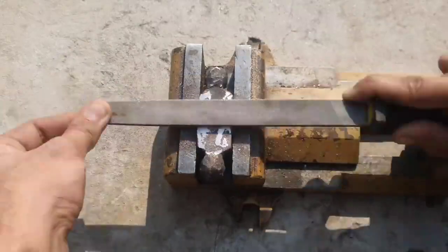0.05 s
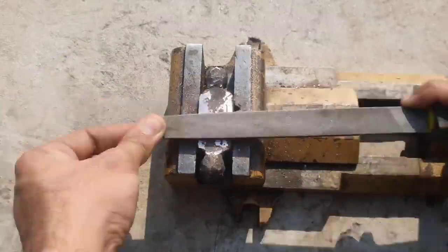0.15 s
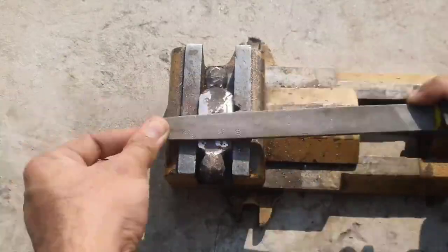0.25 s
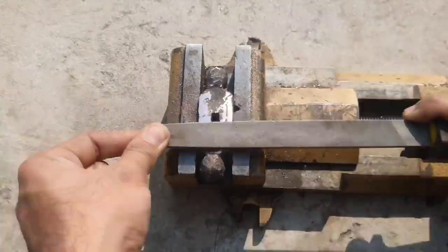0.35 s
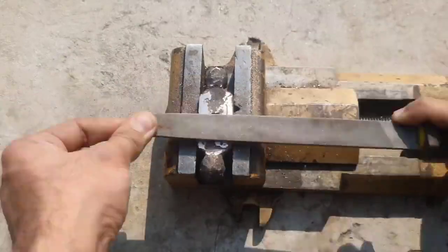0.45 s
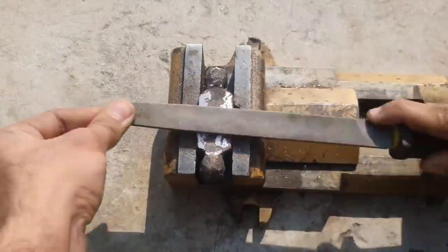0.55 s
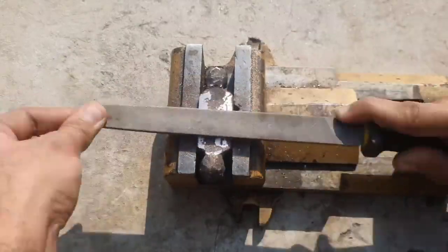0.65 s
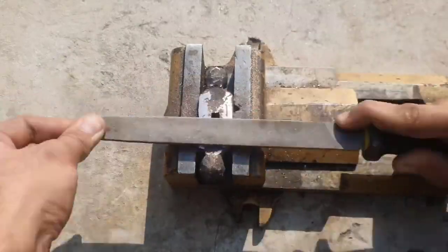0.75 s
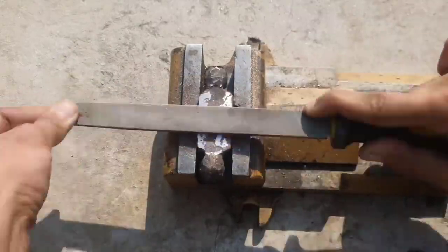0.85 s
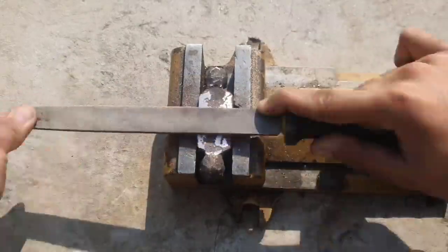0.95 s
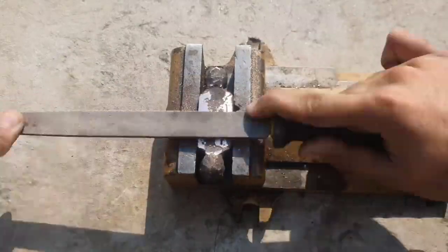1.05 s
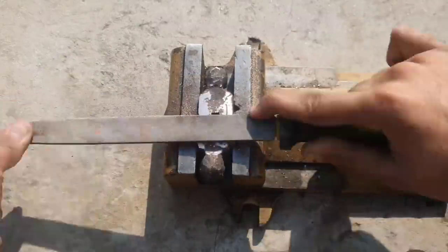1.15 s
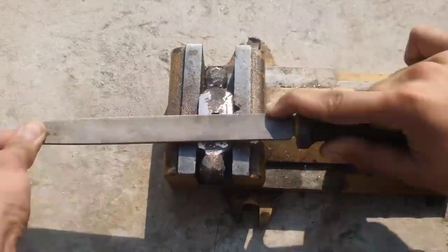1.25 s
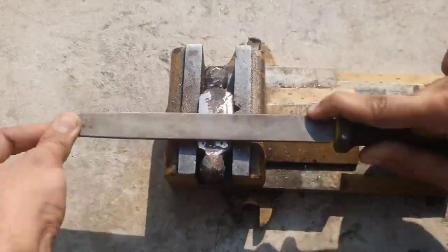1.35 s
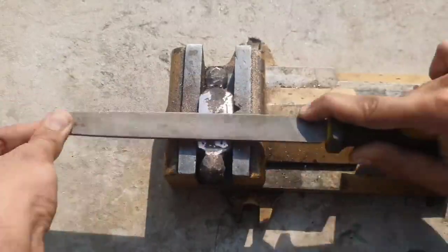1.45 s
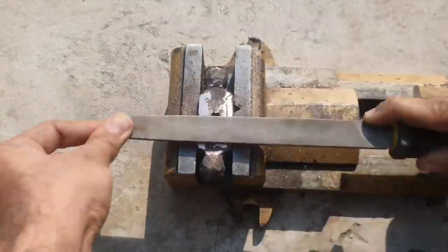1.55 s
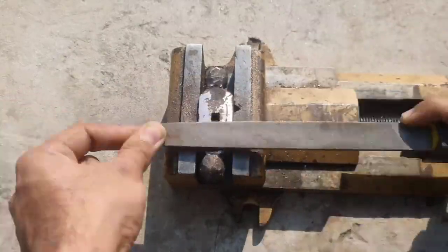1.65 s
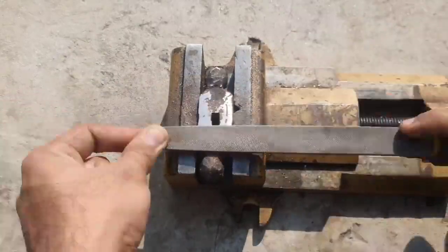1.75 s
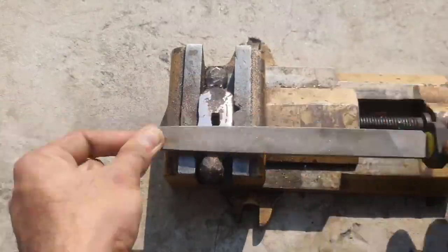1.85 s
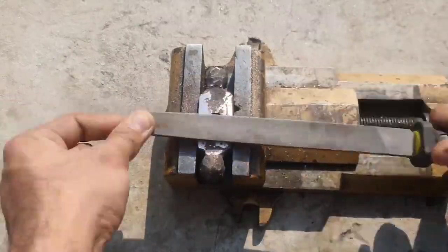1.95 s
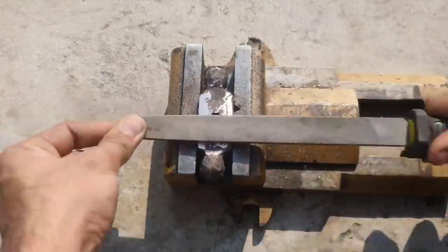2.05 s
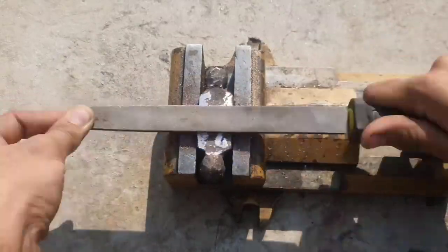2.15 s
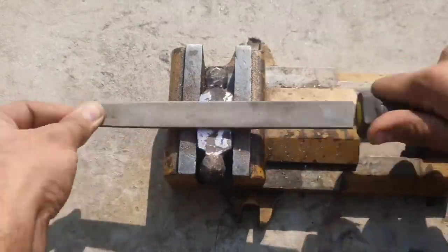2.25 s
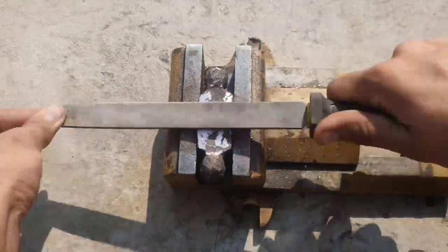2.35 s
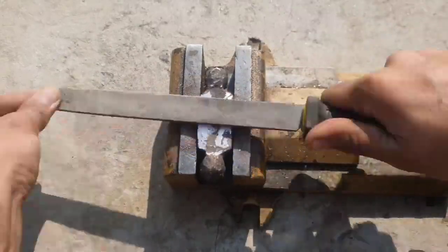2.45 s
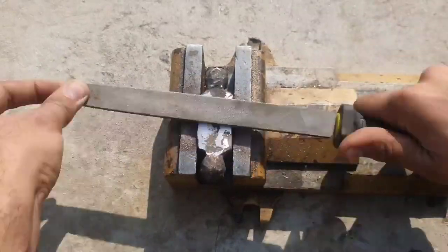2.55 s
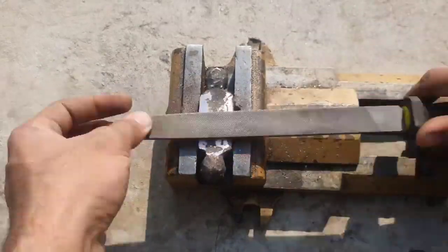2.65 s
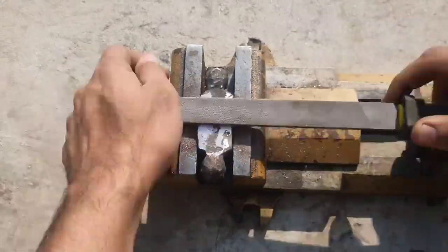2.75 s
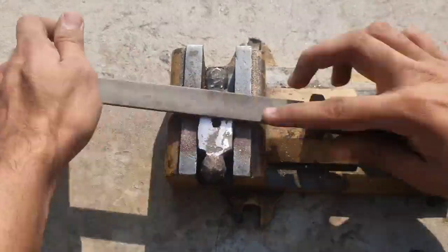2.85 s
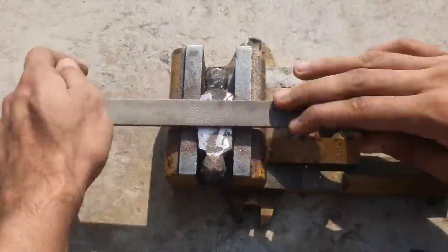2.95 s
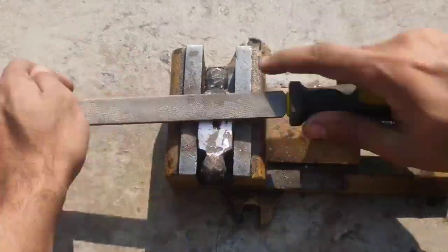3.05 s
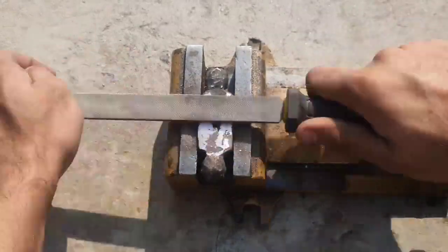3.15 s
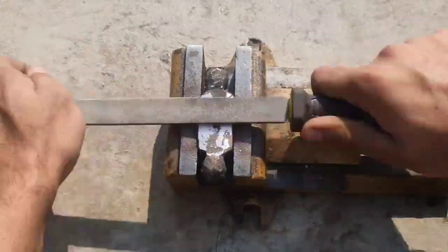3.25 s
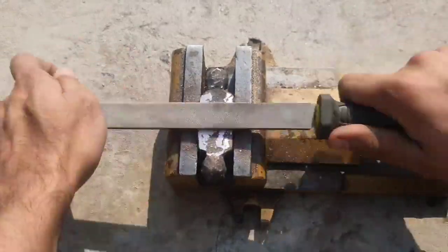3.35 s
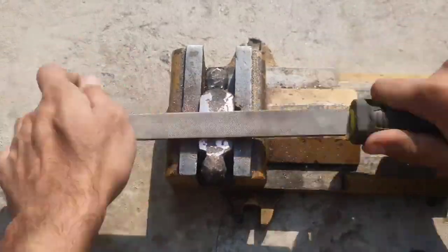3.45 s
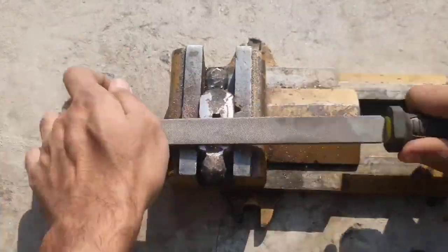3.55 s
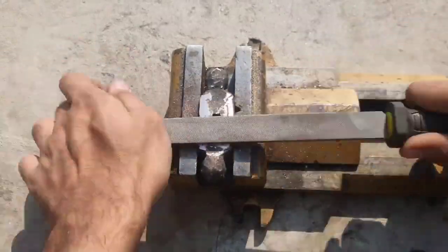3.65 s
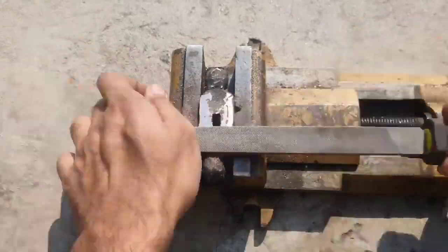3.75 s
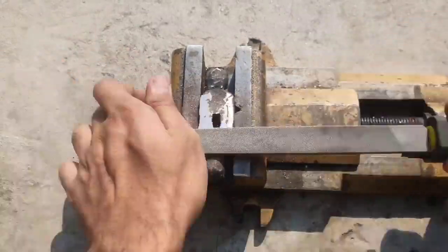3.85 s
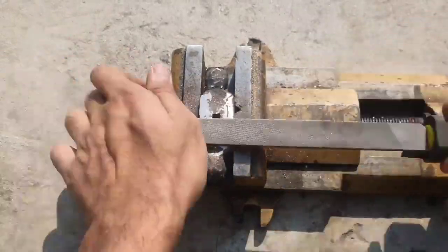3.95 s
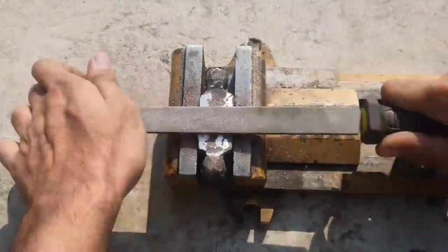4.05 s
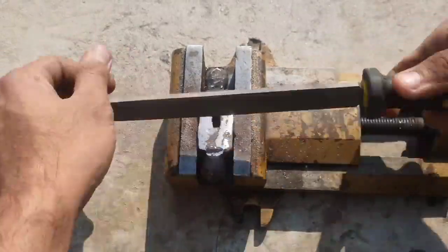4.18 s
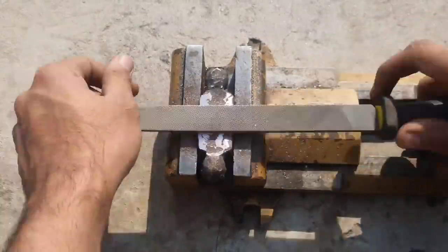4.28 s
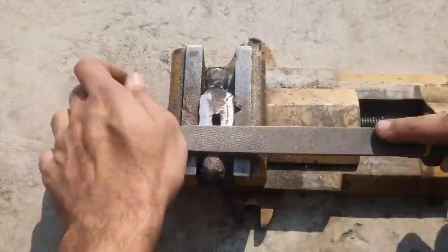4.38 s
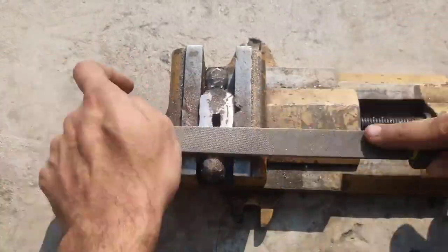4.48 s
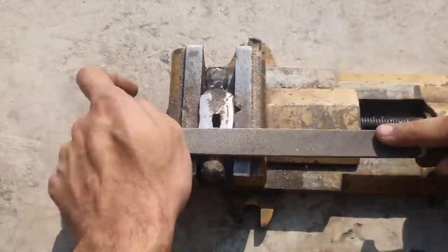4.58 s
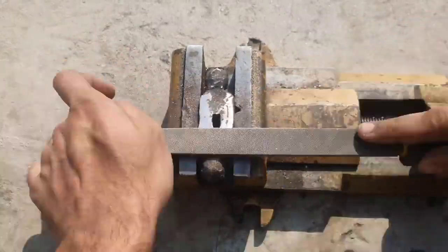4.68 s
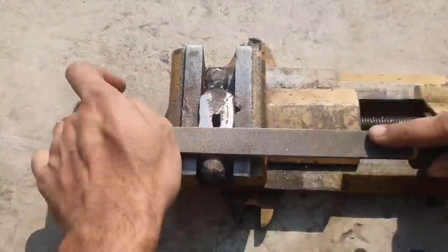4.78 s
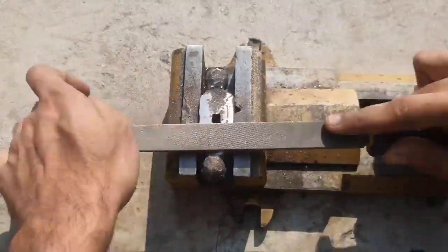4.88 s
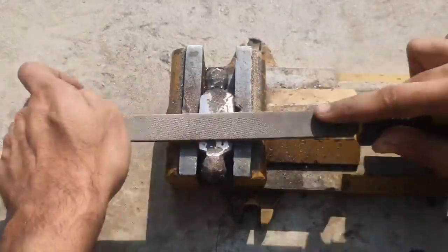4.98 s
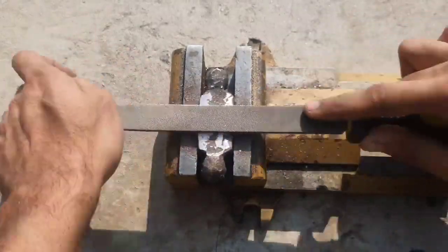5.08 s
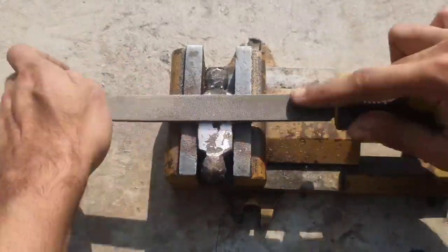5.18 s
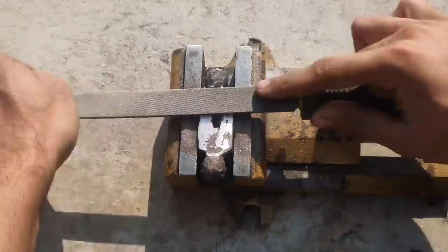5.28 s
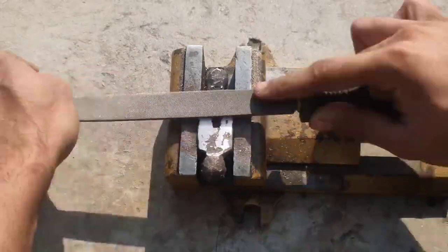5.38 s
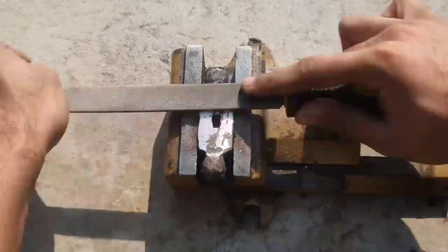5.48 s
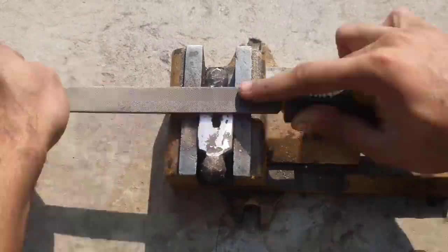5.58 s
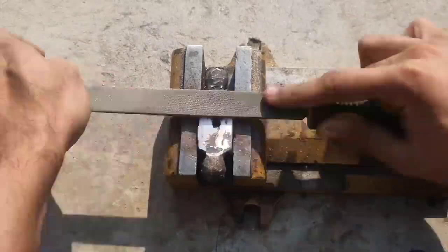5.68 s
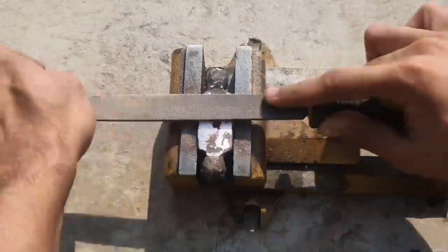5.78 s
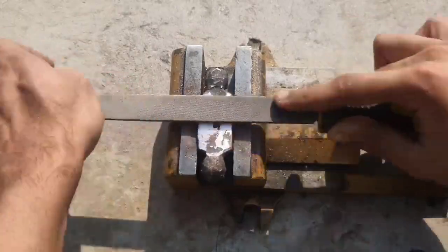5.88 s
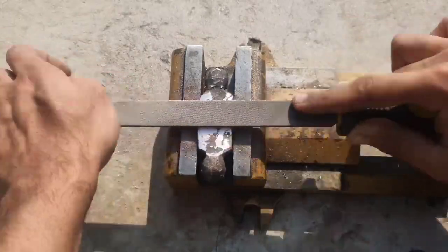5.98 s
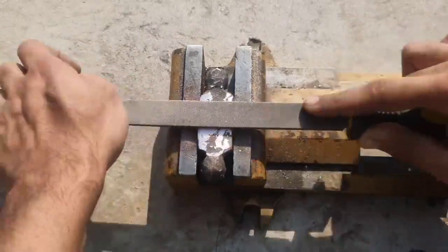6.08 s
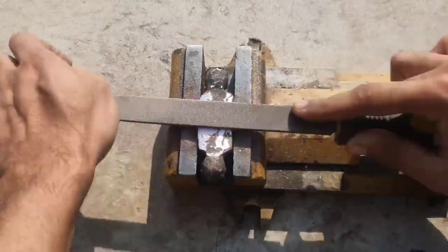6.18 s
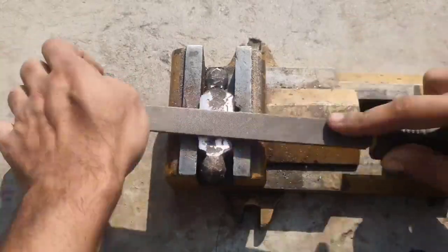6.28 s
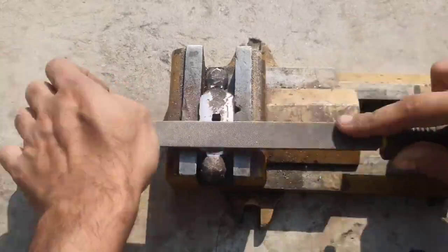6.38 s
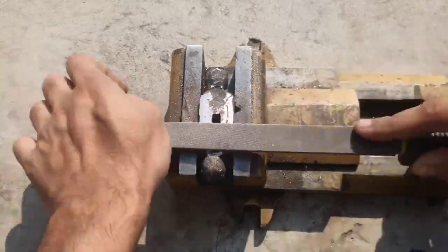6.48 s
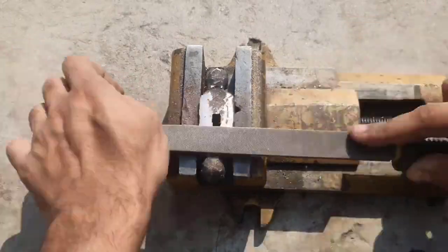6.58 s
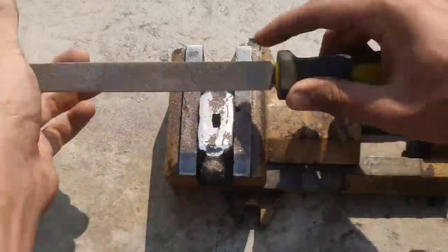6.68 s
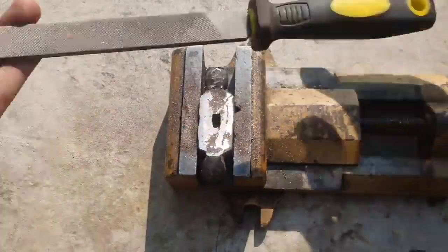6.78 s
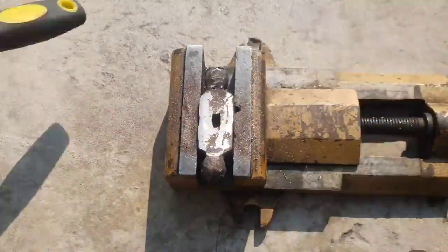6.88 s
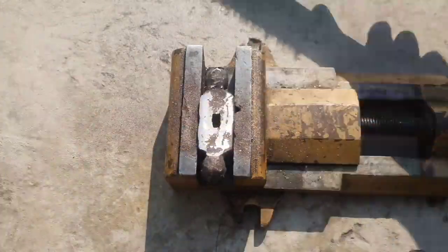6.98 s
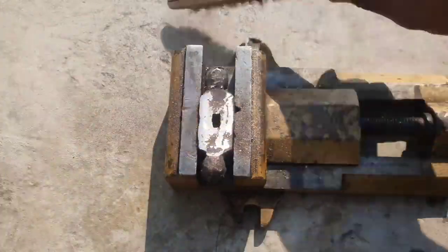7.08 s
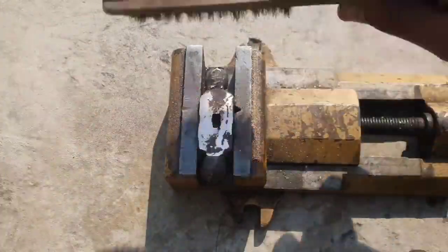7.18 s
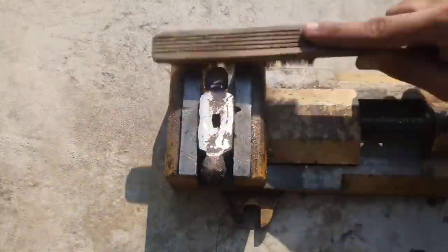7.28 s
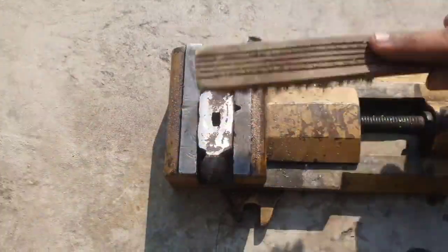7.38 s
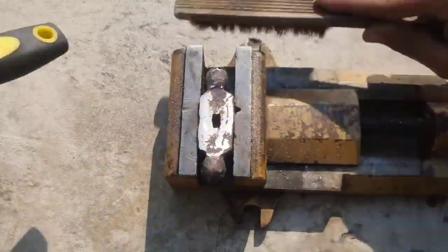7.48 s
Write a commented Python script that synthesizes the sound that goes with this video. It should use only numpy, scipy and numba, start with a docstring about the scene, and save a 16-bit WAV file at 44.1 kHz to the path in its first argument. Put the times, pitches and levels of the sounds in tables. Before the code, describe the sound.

From 0 s a file rasps to and fro over clamped steel, sped up to nearly twenty strokes a second, so the strokes fuse into a harsh, bright, gritty flutter. Each stroke swells, bites and dips at its turn; steel rings around 3.5 kHz with brief chirping squeaks throughout. Firmer knocks stand out near 1.8, 3.9 and 5.6 s, and the rasp gradually grows lighter. Wind thumps the close phone microphone, lightly at first, with a hard puff at 2.5 s, then strong flurries at 3.45 and 4.05-4.27 s, mostly on the left. The file lifts at about 4.2 s, with a soft swish, and resumes near 4.4 s. More puffs come around 5.6 s. Filing ends at 6.7 s. Near-quiet open air, low rumble and faint wavering tones remain, with small ticks at 7.0 s, gentle wipes and swishes around 7.1-7.4 s, and a sharp tap at 7.5 s.

```python
"""Sped-up filing: a file rasps to and fro over a steel blank in a vise, nearly twenty strokes a second as heard.
Dense random tooth clicks ring resonant modes of file and vise; knocks and brief squeaks stand out.
The file lifts briefly near 4.2 s and for good near 6.7 s; light taps, swishes and wipes follow.
Close to a phone outdoors, wind puffs thump on its two microphone ports as damped swings with a noisy wake.
Behind them: gusty low noise, slow pressure swings, two faint late tones and a faint hiss."""
import sys
import numpy as np
from scipy import signal
from scipy.io import wavfile
from scipy.ndimage import uniform_filter1d
from numba import njit

SR = 44100
rng = np.random.default_rng(int(sys.argv[2]) if len(sys.argv) > 2 else 0)


def bounce(signal):
    """Save signal as a 16-bit WAV file at the path given by the first command-line argument."""
    frames = np.transpose(np.atleast_2d(signal))
    limited = np.clip(frames, -1, 1)
    pcm = np.round(limited * 32767).astype(np.int16)
    wavfile.write(sys.argv[1], SR, pcm)


N = 332073

# steel modes: pitch_hz, width_hz (of each pole), level_db (relative), left_minus_right_db, left_lead_rad
RING_MODES = [(3468, 366, -3.5, 2.8, -1.18), (3714, 232, -0.5, 0.36, -0.59)]
RASP_MODES = [(4250, 304, -3, 0.75, 1.17), (5240, 650, -2, 1.3, 1.5), (5878, 380, -3, 2.3, -0.9),
              (6980, 1650, 1.5, 3.7, -0.87), (9280, 450, -5.5, 6.2, -2.5), (9590, 1200, -4, 6.9, -1.5),
              (11000, 1100, -3.5, 1, 3.5), (11770, 3530, 1, 4.4, 2.5), (12670, 840, -7, 7, 1.9),
              (14360, 3800, -7, 4.9, -3)]
# knocks on the steel: start_s, level_db, ring_offset_db, treble_offset_db
KNOCK_EVENTS = [(1.815, -14.5, -11, -11), (2.852, -23.5, -8, -2), (3.566, -22, -16, -20),
                (3.692, -21.5, -2, -14), (3.904, -17, 1.5, -15), (4.007, -23, 3.5, -4),
                (4.321, -37, -8, -20), (4.3566, -40, 8.5, 6.5), (5.043, -24, -14, -21),
                (5.572, -12, -20, -8), (6.716, -24.5, -30.5, -32), (7.078, -42.5, -25, -5),
                (7.488, -25.5, 0.5, 8), (7.501, -25.5, 3.5, -1)]
# squeaks at the hardest tooth bites: centre_s, level_db, pitch_hz
SQUEAK_EVENTS = [(0.084, -31, 3770), (0.313, -15.5, 3580), (0.362, -27, 3680), (0.434, -17, 3740),
                 (0.474, -27, 7060), (0.534, -19, 5570), (0.579, -30, 5700), (0.742, -32, 3960),
                 (0.85, -23.5, 3800), (0.906, -21, 3640), (1.17, -18, 3760), (1.336, -26, 4630),
                 (1.391, -29, 3320), (1.495, -29.0, 6290), (1.772, -33, 3670), (1.815, -38, 3780),
                 (1.877, -38, 3700), (2.036, -22.5, 6470), (2.123, -28, 4260), (2.308, -31, 3800),
                 (2.371, -24.5, 3760), (2.458, -27, 3440), (2.571, -28, 3100), (2.676, -26, 3570),
                 (2.901, -25, 3410), (2.96, -19.5, 3820), (3.119, -36, 3650), (3.219, -27, 5820),
                 (3.279, -17, 4290), (3.329, -21, 3540), (3.551, -28, 3680), (3.655, -30, 3700),
                 (3.709, -14, 3200), (3.915, -23, 7180), (4.022, -19, 6800), (4.16, -27, 3750),
                 (4.499, -23, 3560), (4.656, -21, 3730), (4.819, -24, 3710), (5.076, -27, 3840),
                 (5.13, -22, 3690), (5.185, -26, 6040), (5.402, -23.5, 6150), (5.492, -24.5, 4330),
                 (5.812, -24, 3750), (6.171, -32, 3620), (6.228, -30, 3700), (6.283, -24.5, 3630),
                 (6.455, -22.5, 3630), (6.548, -24.5, 3700), (6.706, -24.5, 3680)]


def undb(db):
    """Decibels to amplitude gain."""
    return np.exp(np.asarray(db) * (np.log(10) / 20))


def unit(x):
    """Scale to rms 1."""
    return x / np.sqrt(np.mean(np.abs(x) ** 2))


def noise():
    """Two unrelated streams of white noise."""
    return rng.standard_normal((2, N))


def walk(rate_hz):
    """Random levels joined by smooth steps, rate_hz levels a second; spread near 1."""
    u = np.arange(N) * (rate_hz / SR)
    levels = rng.standard_normal(1500)
    k = u.astype(int)
    part = u - k
    smooth = part ** 2 * (3 - 2 * part)
    return 1.15 * (levels[k] + (levels[k + 1] - levels[k]) * smooth)


@njit
def two_poles(x, pole):
    """A moving complex pole applied twice to each row."""
    y = np.empty(x.shape, np.complex128)
    for c in range(x.shape[0]):
        a, b = 0j, 0j
        for i in range(x.shape[1]):
            a = a * pole[i] + x[c, i]
            b = b * pole[i] + a
            y[c, i] = b
    return y


def resonate(x, hz, width_hz):
    """Steep resonance whose centre may move; the real part keeps the rms of white noise."""
    pole = np.exp((2j * hz - width_hz) * np.pi / SR) * np.ones(x.shape[1])
    r = np.exp(-2 * width_hz * np.pi / SR)
    return two_poles(x, pole) * np.sqrt(2 * (1 - r) ** 3 / (1 + r))


def filing():
    """Tooth bites and short knocks drive three groups of modes: rasp, file ring and vise."""
    # pitch_hz, width_hz (of each pole), level_db (relative), left_minus_right_db, left_lead_rad
    vise_modes = [(669, 760, -0.5, -0.5, 0.068), (1134, 126, 1, -3, 0), (1383, 444, 9, 0, 0),
                  (1601, 150, -1, -5, 0.0047), (2360, 330, 4.5, 7, 2.22)]
    # hollows where neighbouring modes cancel: pitch_hz, width_hz, depth (0-1)
    hollows = [(2057, 160, 0.6), (2980, 280, .95), (4760, 160, 0.7), (8310, 370, 0.6)]
    knock_s, knock_db, ring_db, treble_db = np.transpose(KNOCK_EVENTS)
    bites = teeth()
    place, (rasp_level_db, ring_level_db, vise_level_db) = strokes()
    # modes, scrape level_db, knock offset_db, pitch drift (share), flicker_db
    groups = ((RASP_MODES, rasp_level_db, treble_db + 8, .025, 2.5),
              (RING_MODES, ring_level_db, ring_db + 9, .011, 3.2),
              (vise_modes, vise_level_db, 13, .04, 2.6))
    out = 0
    for modes, level_db, offset_db, drift, flicker_db in groups:
        blows = np.zeros(N)
        blows[(knock_s * SR).astype(int)] = undb(knock_db + offset_db)
        # a knock is a blow and a few ms of chatter
        decay = signal.lfilter([.16], [1, -np.exp(-1 / (0.004 * SR))], blows)
        chatter = decay * noise()
        out = out + steel(modes, bites * undb(level_db), undb(2.5) * blows + chatter, drift, flicker_db, place)
    for hz, width_hz, depth in hollows:
        r = np.exp(-width_hz * np.pi / SR)
        pole = r * np.exp(2j * np.pi * hz * (1 + .035 * walk(9)) / SR)
        out = out - 2 * depth * (1 - r) ** 2 * two_poles(out, pole).real
    return signal.sosfilt(signal.butter(2, 420, "high", fs=SR, output="sos"), out)


def teeth(rate_hz=9000, spread_db=1.5):
    """Tooth bites: dense clicks of very uneven size, two unrelated streams shared out between the ports later."""
    bites = (rng.random((2, N)) < rate_hz / SR) * noise()
    return unit(bites * undb(spread_db * np.minimum(rng.exponential(size=(2, N)), 5)))


def strokes():
    """Contact point and levels (dB) of rasp, ring and vise: each stroke swells, bites once, slows to its turn."""
    # start_s (at the turn), bite_db, ring_offset_db
    stroke_table = [(0.0, -25.5, -7), (0.061, -25, -5), (0.119, -28, -10.5), (.174, -26.5, -8),
                    (0.237, -29, -7.5), (0.286, -25, -6.5), (0.342, -27.5, -6), (0.4, -24, -6),
                    (0.452, -26, -7), (0.503, -29, -7), (0.554, -27, -6.5), (0.605, -27, -10),
                    (0.661, -28, -6), (0.711, -27.5, -6.5), (0.765, -30.5, -11.5), (0.82, -29, -3.5),
                    (0.873, -27, -6), (0.921, -32, -2.5), (0.98, -30, -7.5), (1.031, -28, -6),
                    (1.088, -31, -2), (1.137, -26, -3.5), (1.195, -30, -5), (1.249, -27.5, -1.5),
                    (1.302, -29.5, -3.5), (1.359, -27, -2.5), (1.41, -32.5, -3), (1.462, -26, -4),
                    (1.517, -34, -2.5), (1.569, -26, -6), (1.62, -33, 2), (1.681, -28.5, -4.5),
                    (1.731, -32.5, -1), (1.793, -22, -7), (1.845, -31.5, 1), (1.899, -28.5, -1.5),
                    (1.954, -34.5, -4.5), (2.003, -30.5, -5.5), (2.055, -33, -4), (2.102, -29, -4),
                    (2.161, -30, -4.5), (2.214, -29.5, -6), (2.271, -32, -2.5), (2.324, -30, -4),
                    (2.382, -30, -3.5), (2.433, -25.5, -7), (2.494, -32.5, -3.5), (2.547, -31, -2),
                    (2.604, -27, -6), (2.658, -29.5, -7), (2.72, -39.5, -1.5), (2.761, -38, 0),
                    (2.82, -39.5, -8), (2.871, -31, -7), (2.929, -32, 3.5), (2.979, -35, -3.5),
                    (3.039, -25.5, -10.5), (3.088, -34, -5), (3.144, -25.5, -7.5), (3.195, -34.5, -4),
                    (3.252, -29, -1.5), (3.306, -34.5, -1.5), (3.355, -33, -2), (3.411, -34, -1.5),
                    (3.462, -33, -2.5), (3.526, -36, 2), (3.569, -35, -3), (3.631, -35, -4),
                    (3.678, -23.5, -5), (3.733, -38, -1), (3.786, -30, -8.5), (3.844, -33, -3),
                    (3.894, -22, -5), (3.942, -34, -1.5), (4.003, -26, -7), (4.05, -32.5, -7.5),
                    (4.115, -30.5, -2), (4.415, -49.5, 2), (4.466, -33, -1.5), (4.52, -34.5, 1),
                    (4.567, -37.5, 1.5), (4.629, -30.5, -2), (4.676, -35.5, -5), (4.733, -36, -1.5),
                    (4.794, -36.5, -3), (4.838, -33.5, -0.5), (4.882, -35.5, -6.5), (4.949, -30, 2),
                    (4.997, -37.5, -1), (5.049, -34, -2.5), (5.103, -34, -2), (5.147, -33, -5),
                    (5.206, -34, -5), (5.261, -30, -8), (5.309, -34, -5), (5.364, -34.5, -5.5),
                    (5.417, -33, -4.5), (5.47, -31.5, -9), (5.525, -33, -5.5), (5.574, -34, -3),
                    (5.628, -38, -1.5), (5.675, -34.5, -6.5), (5.732, -37.5, 1), (5.786, -33, -7.5),
                    (5.831, -42, -0.5), (5.894, -33, -3), (5.938, -39.5, 4.5), (5.996, -32, -9),
                    (6.043, -41.5, -4), (6.098, -33, -5.5), (6.147, -36.5, -3), (6.2, -34, -5),
                    (6.264, -35, 0), (6.303, -34.5, -5), (6.362, -37, -0.5), (6.412, -26.5, -3),
                    (6.461, -39.5, -2), (6.516, -33, -6), (6.567, -37, 0), (6.621, -35, 0), (6.668, -41, 3)]
    # the file leaves the blank: time_s
    lifts = [4.166, 6.735]
    # push and pull alternate; their order flips here: time_s
    flips = [2.8, 4.3]
    # vise under a usual bite: time_s, level_db
    vise_course = [(0, -39.5), (.5, -37.5), (1.0, -37.5), (1.6, -37), (1.82, -32), (2.03, -40.5),
                   (2.4, -37.5), (2.75, -31.5), (3.0, -38.5), (3.4, -34.5), (3.8, -42), (4.2, -35.5),
                   (4.6, -41.5), (5.1, -36.5), (5.65, -41), (6.0, -39.5), (6.42, -37.5), (6.7, -39.5)]
    usual_bite_db, turn_follows, vise_follows = -31, 0.51, 0.35  # follows: dB per dB of bite
    pull_push_bite_share = (0.44, 0.69)  # where the hardest bite falls in the stroke
    pull_push_turn_db = (-54.5, -64)  # rasp left at the turn before a usual stroke
    rasp_over_db, dig_delay_s = 3.5, .012

    t = np.arange(N) / SR
    start, bite_db, ring_db = np.transpose(stroke_table)
    push = (np.arange(len(start)) + np.searchsorted(flips, start)) % 2
    around_db = (bite_db + np.append(bite_db[0], bite_db[:-1])) / 2
    turn_db = np.take(pull_push_turn_db, push) + turn_follows * (around_db - usual_bite_db)
    vise_db = np.interp(start, *np.transpose(vise_course)) + vise_follows * (bite_db - usual_bite_db)
    k = np.clip(np.searchsorted(start, t, "right") - 1, 0, None)
    end, next_db = np.append(start[1:], N / SR), np.append(turn_db[1:], -70.)
    # the harder the bite, the more it stands out of the rasp
    cusp_db = 0.14 * (bite_db - turn_db)
    for s in lifts:
        last = np.searchsorted(start, s) - 1
        end[last], next_db[last] = s, bite_db[last] - 39.0
        turn_db[last + 1:last + 2] = bite_db[last] - 63.0  # the file comes back from near silence
    u = np.clip((t - start[k]) / (end - start)[k], 0, 1)

    bite_s = start + np.take(pull_push_bite_share, push) * (end - start)
    # a knock early in a stroke brings its bite forward
    dig_s = np.transpose(KNOCK_EVENTS)[0] + dig_delay_s
    dug = np.searchsorted(start, dig_s) - 1
    early = (dig_s - start[dug] > 1.2 * dig_delay_s) & (dig_s < bite_s[dug])
    bite_s[dug[early]] = dig_s[early]
    # a squeak sets the bite of its stroke
    squeak_s = np.transpose(SQUEAK_EVENTS)[0]
    bite_s[np.searchsorted(start, squeak_s) - 1] = squeak_s

    # speed is nil at the turns and highest between them
    slow = 1 - np.sin(np.pi * u ** 1.01) ** 0.5
    nearest_turn_db = np.where(u < .5, turn_db[k], next_db[k])
    dip_db = slow * (nearest_turn_db - (bite_db - cusp_db)[k])
    bite = cusp_db[k] * (np.exp(-np.abs((t - bite_s[k]) / 0.0049) ** 1.7) - 1)
    lift_db = -600 * np.sqrt(np.clip(t - end[k], 0, None))
    place = (2 * push[k] - 1) * -np.cos(np.pi * u)  # contact point along the file, -1 to 1
    levels = []
    # smaller share: the heavier parts go on ringing through the turns
    for top_db, share in ((bite_db + rasp_over_db, 1.05), (bite_db + ring_db, .55), (vise_db, .35)):
        levels.append(uniform_filter1d(top_db[k] + lift_db + share * (dip_db + bite), size=88))
    return place, levels


def steel(modes, scrape, blows, drift, flicker_db, place, alike_hz=4500):
    """Scrape and blows ring modes that slide with the contact point; high modes differ between the ports."""
    # treble of the scrape: time_s, tilt (dB per octave above 8 kHz)
    treble_tilt = [(0, 1), (1.5, 3.5), (2.5, -3), (3.8, 1.5), (5.3, -0.5), (7.5, 3)]
    regrip_s, pan_after = 5.1, 0.55  # after the new grip the sound sits nearer the middle (share of the pan)
    slide, colour_db = 0.02, 1.72  # slide: share of pitch; colour: uneven mode levels at about the stroke rate
    out = 0
    pan_share = np.where(np.arange(N) < regrip_s * SR, 1, pan_after)
    tilt_db = np.interp(np.arange(N) / SR, *np.transpose(treble_tilt))
    for hz, width_hz, db, pan_db, lead_rad in modes:
        octaves = max(np.log2(hz / 8000), 0)
        uneven_db = flicker_db * walk(60) + colour_db * walk(18) + tilt_db * octaves
        force = scrape * undb(uneven_db) + blows
        near, other = resonate(force, hz * (1 + drift * walk(30) + slide * place), width_hz)
        # left takes the first stream, right a mix of both
        alike = 1 / np.sqrt(1 + (hz / alike_hz) ** 2)
        right = np.exp(-1j * lead_rad) * (alike * near + np.sqrt(1 - alike ** 2) * other)
        pan = undb(pan_db / 2) ** pan_share
        out = out + undb(db) * np.array([near.real * pan, right.real / pan])
    return out / np.sqrt(sum(undb(mode[2]) ** 2 for mode in modes))


def squeaks():
    """A tooth that catches sings for a few ms, high ones shorter; it reaches the ports as the nearest mode does."""
    half_s, glide_share, over_db = 0.0034, 0.00576, 0.5  # glide: random pitch slide per half length
    out, t = np.zeros((2, N)), np.arange(-3 * half_s, 3 * half_s, 1 / SR)
    modes = np.array(RING_MODES + RASP_MODES)
    for (s, db, hz), (turn, glide) in zip(SQUEAK_EVENTS, rng.standard_normal((len(SQUEAK_EVENTS), 2))):
        pan_db, lead_rad = modes[np.argmin(np.abs(modes[:, 0] - hz)), 3:]
        phase = 2 * np.pi * (hz * (t + glide * glide_share * t ** 2 / half_s / 2) + turn)
        tone = np.array([np.sin(phase) * undb(pan_db / 2), np.sin(phase - lead_rad) / undb(pan_db / 2)])
        swell = np.exp(-np.abs(t / half_s * max(hz / 3700, 1)) ** 0.92)
        i = int((s + t[0]) * SR)
        out[:, i:i + len(t)] += undb(db + over_db) * swell * tone
    return out


def ticks():
    """Light tool ticks: a short damped ring with a noise crack at its start."""
    # start_s, level_db, pitch_hz, decay_s
    tick_table = [(7.001, -23.5, 4340, 0.00096), (7.0065, -35, 4150, 0.0015), (7.052, -15.5, 2860, 0.00034),
                  (7.0012, -29, 5100, .0008), (7.0532, -28, 3900, 0.00073), (7.4882, -8, 5670, 0.00049),
                  (7.4884, -18, 4300, 0.00096), (7.5025, -28, 3300, 0.0048), (7.4886, -19, 12600, 0.0012),
                  (7.5022, -18, 14000, 0.0014), (7.0525, -41, 1430, .002), (4.3215, -37, 3690, 0.0068),
                  (6.7185, -37, 3730, 0.009), (6.837, -43, 980, 0.005), (7.083, -40, 1770, 0.0026)]
    out, t = np.zeros((2, N)), np.arange(SR // 40) / SR
    for s, db, hz, decay_s in tick_table:
        grit = resonate(rng.standard_normal((2, len(t))), 4000.0, 3100.0).real
        crack = undb(-10) * np.exp(-t / 0.00022) * grit
        ring = np.exp(-t / decay_s) * (1 - np.exp(-t / 0.00044)) * np.sin(2 * np.pi * hz * t)
        i = int(s * SR)
        out[:, i:i + len(t)] += undb(db + 2) * (ring + crack)
    return out


def wipes():
    """Light wipes over the steel: grainy noise wakes its high modes."""
    # centre_s, length_s, level_db
    wipe_table = [(7.273, 0.35, -82), (7.083, 0.022, -59), (7.166, 0.017, -62), (7.241, 0.024, -58),
                  (7.305, 0.017, -50.5), (7.371, 0.02, -53.5), (7.429, 0.02, -52.5)]
    # pitch_hz, width_hz (of each pole), level_db (relative)
    wipe_modes = [(3720, 690, -12.5), (9400, 1200, -17), (11400, 1400, -6.5), (13800, 490, 0.5),
                  (14700, 1300, -2), (9000, 15000, -10.5)]
    t = np.arange(N // 2, N) / SR
    swell = sum(undb(db) * np.exp(-((t - s) / (length_s / 2)) ** 2) for s, length_s, db in wipe_table)
    grain = swell * undb(4.2 * walk(190)[:len(t)]) * rng.standard_normal((2, len(t)))
    wiped = sum(undb(db) * resonate(grain, hz, width_hz).real for hz, width_hz, db in wipe_modes)
    return np.pad(wiped, ((0, 0), (N // 2, 0)))


def swishes():
    """Soft swishes: flickering band noise under a bell-shaped swell."""
    # centre_s, length_s, level_db, pitch_hz, width_hz (of each pole)
    swish_table = [(4.176, 0.069, -43, 3600, 1400), (4.338, 0.05, -39.5, 1130, 370),
                   (4.345, 0.034, -54, 3540, 420), (4.185, 0.039, -56, 8600, 6500),
                   (6.982, 0.044, -62, 4000, 570), (6.971, 0.058, -64, 7200, 900),
                   (6.985, 0.062, -67, 11300, 990), (7.005, 0.01, -58, 14800, 1200),
                   (7.189, 0.048, -65.5, 5200, 600), (7.279, 0.048, -65, 6340, 600),
                   (6.841, 0.088, -62.5, 1300, 470), (7.057, 0.053, -55, 1300, 2000),
                   (7.18, .06, -60.5, 1400, 780), (7.35, .09, -58, 1160, 540), (7.41, .06, -51, 990, 700)]
    out = np.zeros((2, N))
    for s, length_s, db, hz, width_hz in swish_table:
        t = np.arange(-2 * length_s, 2 * length_s, 1 / SR)
        i = int((s - 2 * length_s) * SR)
        band = resonate(rng.standard_normal((2, len(t))), hz, width_hz).real
        flicker = undb(5.2 * walk(154.0)[:len(t)])
        out[:, i:i + len(t)] += undb(db) * np.exp(-(t / (length_s / 2)) ** 2) * band * flicker
    return out


def thumps():
    """Each wind puff swings a port cavity for a few cycles and leaves a churning wake, longer after soft puffs."""
    # start_s, level_db (at the louder port)
    thump_table = [(0.03, -28), (0.266, -29), (0.490, -28.5), (0.904, -32), (1.017, -34), (1.197, -30),
                   (1.332, -27), (1.545, -32), (2.298, -29), (2.487, -7.5), (2.887, -18.5), (2.906, -21),
                   (3.125, -21), (3.433, -13.5), (3.453, -7), (3.472, -8), (3.488, -15), (3.498, -11.5),
                   (3.57, -18), (4.057, -9.5), (4.112, -11), (4.122, -7), (4.138, -14), (4.156, -12),
                   (4.168, -13.5), (4.18, -5.5), (4.188, -5), (4.197, -26), (4.208, -13.5), (4.224, -34),
                   (4.242, -26), (4.261, -11), (4.270, -9), (4.29, -43), (4.845, -23.5), (5.047, -19.5),
                   (5.194, -23), (5.575, -15.5), (5.674, -13), (5.726, -16), (5.759, -25.5), (6.068, -24.5),
                   (6.261, -23), (6.273, -29), (6.306, -20.5), (6.462, -23.5), (6.787, -33), (6.812, -31.5),
                   (6.837, -30), (6.949, -40), (7.228, -39), (7.3, -29)]
    cavity_hz, width_hz = 310, 182
    left_from_s, left_to_s, left_pan_db, scatter_db = 2.4, 4.4, 25, 4.5  # wind on the left port, else on both
    after_s, after_db = 0.011, -21  # a weaker puff trails each thump; both values scatter
    out, wake, t = np.zeros((2, N)), np.zeros((2, N)), np.arange(SR // 20) / SR
    for (first_s, first_db), chance in zip(thump_table, rng.standard_normal((len(thump_table), 2, 5))):
        for trails, (tune, sign, side, late, size) in enumerate(chance):
            s = first_s + trails * after_s * np.exp(0.33 * late)
            db = first_db + trails * (after_db + 3.3 * size)
            pan_db = left_pan_db * (left_from_s < s < left_to_s) + scatter_db * side
            hz = cavity_hz * np.exp(0.095 * tune)
            swing = np.sin(2 * np.pi * hz * t + 0.63)
            puff = np.exp(-np.pi * width_hz * t) * (1 - np.exp(-t / 0.0011)) * swing
            # hard puffs start crisper
            crisp = np.exp(-t / 0.0012) * np.sin(2 * np.pi * 1.85 * hz * t)
            puff = puff + undb(-8.0 + .4 * db) * crisp
            i = int((s - .0015) * SR)
            gain = undb(db + np.minimum([[pan_db], [-pan_db]], 0))
            out[:, i:i + len(t)] += (np.sign(sign) * 2.05 * gain * puff)[:, :N - i]
            wake[:, i:i + len(t)] += (gain * np.exp(-t / (0.006 - 0.00031 * db)))[:, :N - i]
    churn = resonate(noise(), 261.0, 358.0).real
    churn = churn + undb(-11.5) * resonate(noise(), 750.0, 2200.0).real
    wind = out + undb(-7.0) * uniform_filter1d(wake, size=180) * churn
    wind = signal.sosfilt(signal.butter(3, [135, 1500], "band", fs=SR, output="sos"), wind)
    # the ports round off the strongest puffs
    top = .55
    return top * np.tanh(wind / top)


def hum():
    """Two faint wavering tones that come and go near the end."""
    # pitch_hz, level_db (relative)
    tone_table = [(457.6, -59.5), (576.0, -60)]
    # time_s, level_db (relative)
    hum_course = [(6.0, -28), (6.35, -5), (6.8, 6.5), (6.89, -20.5), (6.96, 3), (7.03, -13), (7.24, -20),
                  (7.29, 2), (7.53, 4)]
    t = np.arange(N) / SR
    tones = 0
    for hz, db in tone_table:
        level = undb(db + 3.5 + 3.5 * walk(13.0))
        tones = tones + level * np.sin(2 * np.pi * np.cumsum(hz + 6.5 * walk(25.0)) / SR)
    return tones * undb(np.interp(t, *np.transpose(hum_course), left=-99))


def rumble():
    """Gusty low noise: bands swell together and flicker alone, partly unrelated between the ports."""
    # time_s, level_db (relative)
    rumble_course = [(0.0, -45.5), (0.27, -43), (0.63, -54), (1.468, -42), (2.2, -53), (2.52, -43.5),
                     (3.92, -53.5), (4.11, -46.5), (4.3, -63.5), (4.84, -51.5), (4.99, -50.5), (5.411, -50),
                     (5.62, -39.5), (5.95, -51.5), (6.61, -46), (7.05, -56.5), (7.53, -43.5)]
    # pitch_hz, level_db (relative)
    colour = [(100, -23.5), (170, -35.5), (330, 23.5), (570, -15.5), (900, -10.5), (1500, -10.5),
              (2300, -40.5)]
    hz, colour_db = np.transpose(colour)
    out, gust, apart = 0, walk(20), undb(-10.5 + 8.77 * walk(4.003))
    for centre_hz in 104 * 1.6 ** np.arange(8):
        mid, side = resonate(noise(), centre_hz, 0.5 * centre_hz).real * np.sqrt(centre_hz)
        db = np.interp(np.log(centre_hz), np.log(hz), colour_db) + 2.8 * gust + 4.76 * walk(25)
        out = out + undb(db) * np.array([mid + apart * side, mid - apart * side])
    out = signal.sosfilt(signal.butter(2, 130, "high", fs=SR, output="sos"), out)
    return unit(out) * undb(4.5 + np.interp(np.arange(N) / SR, *np.transpose(rumble_course)))


def deep():
    """Slow pressure swings at each port: very low band noise in fits and starts."""
    # time_s, level_db (before the random fits)
    deep_course = [(0, -82), (.7, -90), (1.6, -76), (3.4, -81), (4.2, -76), (5.6, -61), (6.3, -60),
                   (6.9, -70), (7.53, -75)]
    fits = undb(np.interp(np.arange(N) / SR, *np.transpose(deep_course)) + 4.2 * walk(5.4))
    return fits * resonate(noise(), 36.0, 70.).real


def hiss():
    """Faint uneven hiss of the open air: broad band noise."""
    return undb(-76 + 2.5 * walk(24)) * resonate(noise(), 4100.0, 7900.0).real


def scene():
    """All sources summed at the two ports."""
    tools = filing() + squeaks() + ticks() + wipes() + swishes()
    return tools + thumps() + hum() + rumble() + deep() + hiss()


def record(dry):
    """The phone cuts the top: a steep low-pass."""
    top_hz = 15650
    return signal.sosfilt(signal.ellip(10, .2, 80, top_hz, fs=SR, output="sos"), dry)


dry = scene()
out = record(dry)
bounce(out)
```